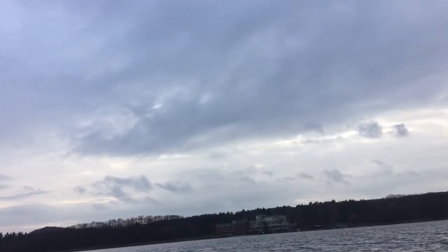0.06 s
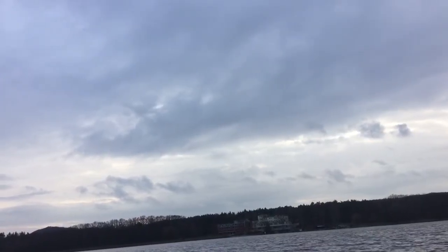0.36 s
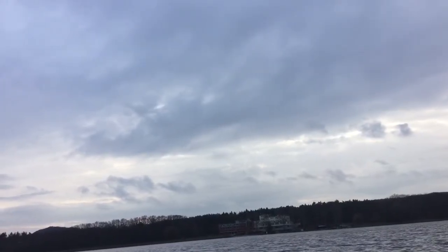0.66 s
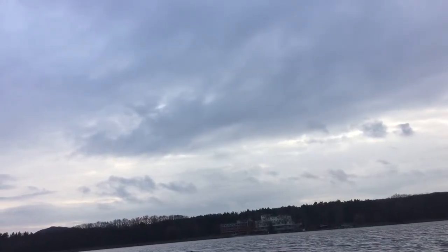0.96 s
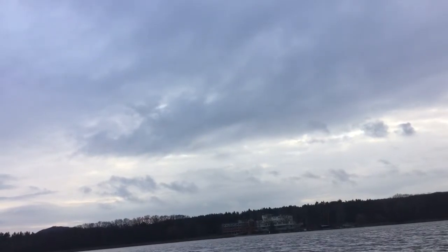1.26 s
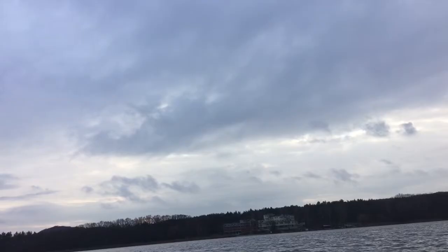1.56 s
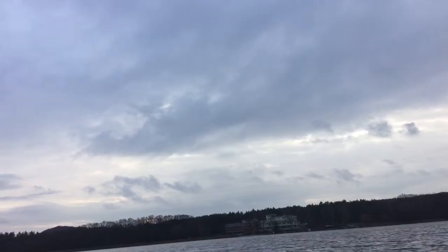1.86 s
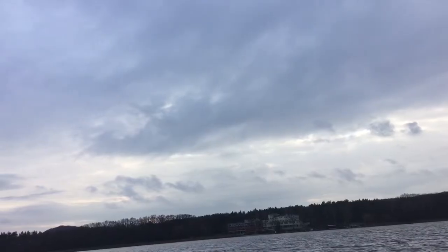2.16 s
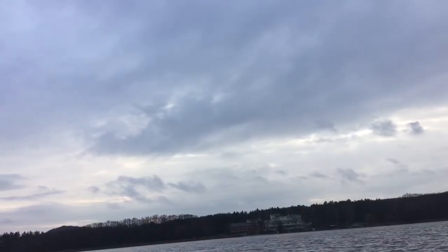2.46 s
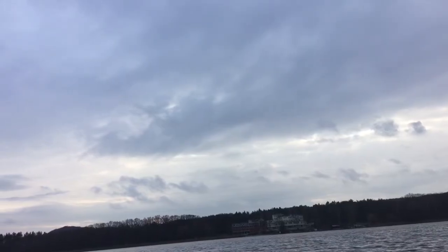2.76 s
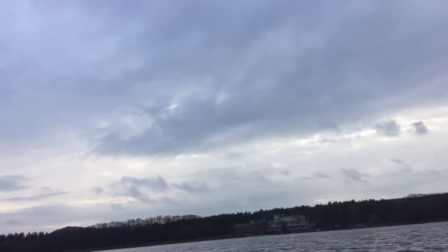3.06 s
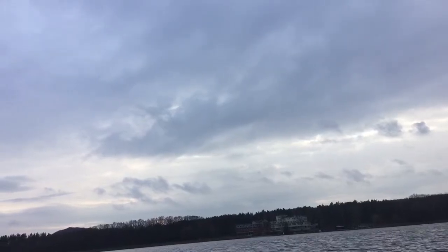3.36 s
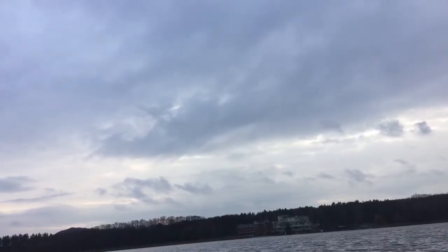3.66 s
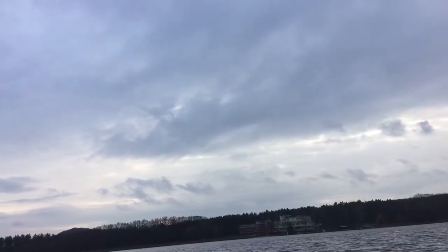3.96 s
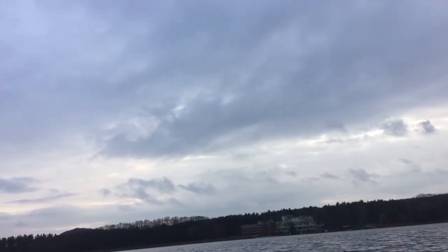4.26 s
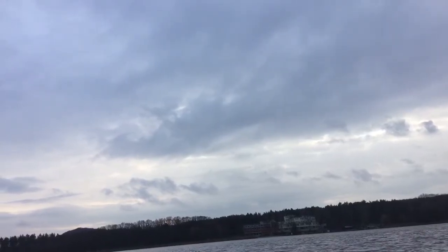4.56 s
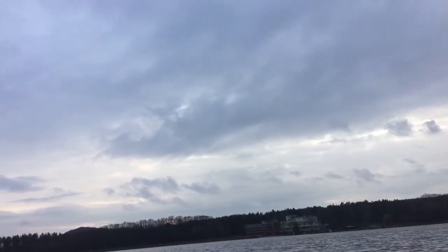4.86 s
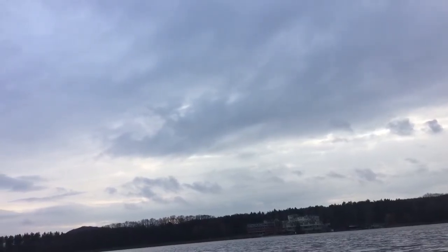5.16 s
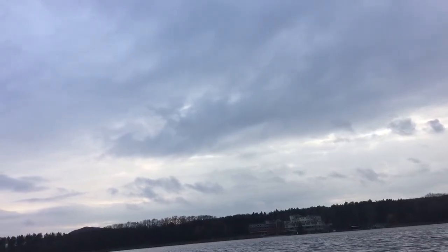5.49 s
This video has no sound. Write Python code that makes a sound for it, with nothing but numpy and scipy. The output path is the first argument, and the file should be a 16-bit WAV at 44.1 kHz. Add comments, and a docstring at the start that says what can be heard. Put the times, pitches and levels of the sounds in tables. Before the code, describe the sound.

Low wind rumbles and thumps unevenly on the microphone throughout, heard close and dry aboard a small sailing boat on a lake. A slack sail slides over itself and crinkles softly, with distinct flaps at about 1 second, from 1.2 to 1.5 seconds and near 1.9 seconds. The rigging gives faint, very short squeaks near 0.2, 0.9 and 2.9 seconds. A stronger gust thumps at about 2.5 seconds, followed by a small tick of gear. The sail flaps again around 3.2 seconds, then rustles hard from 3.5 to 3.9 seconds among sharp ticks, the loudest at 3.6 seconds. At 4.4 seconds a rope runs briefly over a fitting, which rings lightly. The sail flaps firmly just after 5 seconds, a sharp click follows at 5.3 seconds, and the cloth swishes until about 5.6 seconds.

```python
"""A small sailing boat on a breezy lake, heard from on board.
From the start, eddies thump on the microphone while the slack sail flaps, crinkles and slides over
itself; now and then the rigging squeaks and small gear ticks. Around 3.6 s the cloth rustles hard
among sharp ticks. At 4.4 s a rope runs over a ringing fitting, then the sail flaps and swishes again."""
import sys
import numpy as np
from scipy import signal
from scipy.fft import rfft, irfft, next_fast_len
from scipy.io import wavfile
from scipy.ndimage import uniform_filter1d

SR = 44100
rng = np.random.default_rng(int(sys.argv[2]) if len(sys.argv) > 2 else 0)


def digitize_waveform(pressure):
    """Quantize a signal to 16-bit integers and store it at the path in sys.argv[1].

    Rows of a 2-D input are taken as channels; values are limited to [-1, 1].
    """
    field = np.atleast_2d(pressure).T
    bounded = np.clip(field, -1, 1)
    quanta = np.round(bounded * 32767).astype(np.int16)
    wavfile.write(sys.argv[1], SR, quanta)


N = 248283
TIME = np.arange(N) / SR
CUTOFF_HZ = 15200


# The bed of wind. Each row: time in seconds, rumble and flutter levels in dB before trim.
WIND_BED = [(0, -58, -50), (0.05, -50, -63), (0.08, -30.5, -42.5), (0.2, -40.5, -52), (0.26, -37.5, -51),
            (0.35, -36, -44.5), (0.45, -36.5, -63), (0.55, -37.5, -46), (0.65, -36.5, -44),
            (0.74, -40, -59), (0.82, -37.5, -41), (0.95, -38.5, -45.5), (1.03, -44.5, -43),
            (1.17, -38, -52.5), (1.3, -39, -42.5), (1.43, -39.5, -35.5), (1.51, -44.5, -51.5),
            (1.6, -42, -47), (1.68, -32.5, -45.5), (1.75, -49.5, -55), (1.85, -36.5, -39),
            (1.95, -34.5, -41.5), (2.02, -45.5, -48), (2.11, -40, -59), (2.21, -48.5, -56.5),
            (2.3, -37.5, -48), (2.38, -41, -45.5), (2.46, -31.5, -44), (2.54, -26.5, -38.5),
            (2.6, -44, -54), (2.67, -33.5, -44.5), (2.74, -48, -63.5), (2.81, -36, -48.5),
            (2.92, -44.5, -52), (3.0, -45, -59.5), (3.11, -48.5, -52), (3.16, -43, -46.5), (3.3, -38, -53),
            (3.39, -34, -41), (3.44, -50, -48), (3.52, -47, -46.5), (3.6, -36.5, -40.5),
            (3.74, -45.5, -48.5), (3.85, -36, -53), (3.9, -45.5, -44.5), (3.98, -37.5, -49),
            (4.14, -41.5, -63), (4.22, -37, -51), (4.34, -39, -40), (4.39, -44.5, -51.5),
            (4.53, -43.5, -53.5), (4.6, -43, -46), (4.64, -40, -50.5), (4.7, -37.5, -42.5),
            (4.83, -38.5, -43.5), (4.89, -39, -51), (4.97, -35.5, -59), (5.1, -42.5, -36),
            (5.17, -38.5, -49), (5.23, -51, -47.5), (5.28, -37.5, -44), (5.44, -36, -46), (5.55, -41, -42),
            (5.63, -31, -54)]
# Eddies hitting the microphone. Each row: centre in seconds, half length in seconds, pitch in Hz,
# thump and flutter burst levels in dB before trim.
EDDY_HITS = [(0.072, 0.0077, 111, -28, -36.5), (0.306, 0.009, 96, -30, -56),
             (0.361, 0.0064, 132, -27.5, -43), (0.411, 0.0078, 79, -20, -44),
             (0.486, 0.0099, 109, -24.5, -41), (0.539, 0.0086, 133, -39, -44),
             (0.594, 0.0075, 87, -27.5, -35.5), (0.712, 0.0069, 103, -29.5, -32.5),
             (0.772, 0.0065, 90, -26.5, -42), (0.825, 0.014, 101, -32, -44),
             (0.869, 0.012, 102, -39, -36.5), (0.934, 0.011, 109, -24.5, -37),
             (0.97, 0.011, 95, -26, -35.5), (1.061, 0.011, 106, -29, -42.5),
             (1.133, 0.0068, 77, -23.5, -40.5), (1.221, 0.0075, 98.6, -25, -40.5),
             (1.297, 0.0063, 106, -28, -37), (1.414, 0.011, 115, -26, -37.5), (1.644, 0.0085, 87, -23, -32),
             (1.837, 0.0068, 110, -28.5, -46), (1.912, 0.012, 116, -34, -39.5),
             (2.069, 0.01, 132, -27.5, -44), (2.152, 0.0053, 112, -29.5, -41.5),
             (2.276, 0.0097, 72.5, -24, -39.5), (2.561, 0.005, 103, -15.5, -32.5),
             (2.615, 0.0091, 95, -28.5, -48), (3.168, 0.014, 105, -30, -52), (3.222, 0.0098, 100, -28, -42),
             (3.275, 0.0096, 111, -33.5, -37), (3.335, 0.011, 116, -40, -37.5),
             (3.576, 0.012, 125, -30.5, -37), (3.796, 0.0086, 113, -18.5, -32),
             (3.859, 0.008, 102, -33, -48), (4.091, 0.0083, 96.3, -22, -46),
             (4.196, 0.0081, 89, -26, -50.5), (4.356, 0.0048, 105, -25, -39),
             (4.584, 0.0071, 92, -26.5, -35.5), (4.755, 0.0041, 108, -19, -39.5),
             (4.83, 0.013, 94, -35.5, -35), (4.977, 0.01, 106, -26.5, -42.5),
             (5.067, 0.012, 107, -30.5, -32), (5.309, 0.0075, 89, -28.5, -36.5),
             (5.431, 0.01, 92, -29.5, -39.5)]
# Tone of the deep rumble and of the flutter above it. Each row: frequency in Hz, relative level in dB.
RUMBLE_EQ = [(12, -40), (20, -31.5), (47, -3), (81, 2), (107, -1.5), (220, -16), (290, -48.5), (480, -120)]
FLUTTER_EQ = [(110, -20), (175, 2.5), (250, -1.5), (330, -7.5), (450, -19), (650, -37.5), (1000, -64)]

def wind(rumble_trim_db=1.5, thump_trim_db=-1.5, burst_trim_db=2.5, sag_per_s=20.3, lead_s=0.0018):
    """Turbulence on the microphone; each eddy adds a thump of sagging pitch and a burst of flutter."""
    rumble_db, flutter_db = automation(WIND_BED)
    thumps, bursts = np.zeros(N), np.zeros(N)
    for at_s, half_s, hz, thump_db, burst_db in EDDY_HITS:
        near, t = around(at_s, reach_s=0.06)
        phase = 2 * np.pi * (hz * (t - sag_per_s * t * t / 2) + rng.random())
        thump_shape = np.exp(-0.5 * (t / half_s) ** 2)
        burst_shape = np.exp(-0.5 * ((t + lead_s) / (1.035 * half_s)) ** 2)  # small whirls arrive first
        thumps[near] += from_db(thump_db + thump_trim_db) * np.sqrt(2) * thump_shape * np.sin(phase)
        bursts[near] += from_db(burst_db + burst_trim_db) * burst_shape
    rumble = levelled(equalised(rng.standard_normal(N), RUMBLE_EQ), span_s=0.069)
    flutter = levelled(equalised(rng.standard_normal(N), FLUTTER_EQ), span_s=0.016)
    flutter_gain = np.hypot(from_db(flutter_db), bursts)
    return from_db(rumble_db + rumble_trim_db) * rumble + thumps + flutter_gain * flutter


# Cloth sliding over itself. Each row: time in seconds, body, crinkle and swish levels in dB before trim.
SAIL_SLIDE = [(0, -66, -70, -77), (0.1, -62, -74, -73), (0.13, -56, -68, -80), (0.21, -67, -61, -80),
              (0.27, -67, -77, -75), (0.32, -56, -71, -80), (0.42, -65, -66.5, -78),
              (0.5, -62.5, -73.5, -81), (0.57, -66.5, -76, -79), (0.68, -67, -67.5, -76),
              (0.75, -68, -68, -77), (0.82, -60, -64.5, -76), (0.9, -62, -73, -75), (1.0, -58, -61.5, -70),
              (1.08, -67, -75, -71), (1.16, -61, -70.5, -74.5), (1.22, -50, -62, -74),
              (1.26, -67, -72, -78), (1.33, -57, -59, -72), (1.36, -48.5, -61, -62),
              (1.43, -52.5, -54.5, -59), (1.49, -52.5, -64, -80), (1.6, -59.5, -76, -75),
              (1.7, -61, -66, -73.5), (1.77, -68, -68, -76), (1.84, -57, -70, -82), (1.95, -52, -70, -76),
              (2.02, -65, -75, -81), (2.2, -69, -74.5, -77.5), (2.4, -68, -72, -79),
              (2.51, -61.5, -75, -77.5), (2.57, -59, -58, -71), (2.63, -59, -62, -77),
              (2.7, -69.5, -72.5, -77), (2.79, -66, -65.5, -68.5), (2.84, -70, -61.5, -70),
              (2.95, -69, -73, -75), (3.0, -65.5, -75, -69), (3.08, -65, -68, -75), (3.16, -61, -66, -71),
              (3.24, -59, -60.5, -72), (3.33, -61, -60, -68), (3.44, -59.5, -68, -76),
              (3.47, -48.5, -50.5, -71), (3.54, -48.5, -52.5, -67.5), (3.59, -47, -47, -67),
              (3.63, -45.5, -57, -70), (3.67, -55, -45, -56), (3.71, -57, -49.5, -65),
              (3.755, -56, -61, -71), (3.82, -51.5, -48.5, -60), (3.865, -48, -50, -64),
              (3.9, -63, -73, -75), (3.98, -72.5, -74.5, -79), (4.06, -67, -73.5, -81),
              (4.12, -61.5, -65.5, -75), (4.2, -67, -73.5, -81.5), (4.28, -68, -76, -84),
              (4.35, -62, -71, -77), (4.53, -69, -70, -83), (4.62, -63, -65, -78), (4.68, -67, -67, -75),
              (4.71, -58, -56, -59.5), (4.77, -60, -60.5, -61), (4.81, -59.5, -73, -68),
              (4.88, -64.5, -71.5, -78.5), (5.02, -69, -71.5, -76), (5.11, -64, -65, -76),
              (5.2, -54.5, -64.5, -75), (5.24, -61, -67, -73), (5.28, -53, -57.5, -74),
              (5.345, -56, -55, -75), (5.365, -58, -51.5, -54), (5.44, -56.5, -54.5, -53.5),
              (5.485, -56, -53.5, -53), (5.52, -55, -59, -74), (5.58, -65, -57.5, -67.5),
              (5.63, -67, -74, -88)]
# Flaps of the sail. Each row: peak time, rise and fall in seconds, then body, crinkle and swish levels
# in dB before trim.
SAIL_FLAPS = [(0.052, 0.0053, 0.008, -73, -67.5, -64), (0.118, 0.004, 0.016, -61, -62.5, -73),
              (0.176, 0.0055, 0.012, -55.5, -58, -63.5), (0.341, 0.0089, 0.013, -55, -52.5, -72),
              (0.374, 0.0036, 0.011, -52, -49, -50), (0.402, 0.003, 0.0078, -59, -57, -68),
              (0.56, 0.02, 0.02, -68, -72, -69), (0.964, 0.008, 0.012, -36, -53.5, -52),
              (1.181, 0.0035, 0.012, -46.5, -52, -54), (1.282, 0.0093, 0.022, -41, -63.5, -67),
              (1.308, 0.0057, 0.01, -53, -60, -62), (1.346, 0.006, 0.019, -50, -49, -51.5),
              (1.401, 0.013, 0.01, -61, -55, -60), (1.429, 0.0053, 0.02, -56, -59, -56),
              (1.797, 0.0065, 0.016, -52.5, -53, -69.5), (1.872, 0.012, 0.013, -45.5, -70, -78),
              (1.887, 0.008, 0.011, -47, -54, -63.5), (1.92, 0.006, 0.016, -37, -54, -69),
              (2.256, 0.004, 0.008, -56, -71, -82), (2.534, 0.0034, 0.011, -62, -52.5, -58.5),
              (2.55, 0.01, 0.007, -47.5, -64, -74), (2.608, 0.005, 0.016, -69, -61, -69),
              (2.819, 0.0055, 0.015, -64, -59, -71), (2.872, 0.016, 0.023, -57.5, -56, -64),
              (3.176, 0.0055, 0.01, -53, -53.5, -56.5), (3.19, 0.01, 0.017, -53, -53, -52),
              (3.286, 0.0055, 0.017, -43.5, -49.5, -63), (3.581, 0.0075, 0.008, -42.5, -48, -64),
              (3.675, 0.0024, 0.0048, -50, -43.5, -50), (3.785, 0.0065, 0.013, -59, -40, -47.5),
              (3.858, 0.011, 0.014, -53, -48, -67), (3.934, 0.006, 0.011, -60, -81, -84),
              (4.318, 0.0089, 0.01, -59, -69.5, -76), (4.374, 0.0052, 0.014, -64, -57.5, -55),
              (4.571, 0.0044, 0.014, -61, -55, -60.5), (4.65, 0.0049, 0.014, -54, -51, -61.5),
              (4.752, 0.008, 0.019, -54.5, -65, -61), (5.049, 0.0065, 0.013, -39.5, -47.5, -49.5),
              (5.067, 0.0046, 0.016, -38, -48, -49.5), (5.148, 0.007, 0.018, -67, -63.5, -79),
              (5.228, 0.006, 0.01, -52, -62, -68.5), (5.324, 0.002, 0.0067, -39.5, -47, -75)]

def cloth_band(band, eq, grain, slide_trim_db, flap_trim_db):
    """One band of cloth (0 body, 1 crinkle, 2 swish): it rustles as it slides and swells at each flap."""
    flap_power = np.zeros(N)
    for peak_s, rise_s, fall_s, *levels_db in SAIL_FLAPS:
        near, t = around(peak_s, reach_s=0.15)
        shape = np.exp(-(np.minimum(t, 0) / rise_s) ** 2 - np.maximum(t, 0) / fall_s)
        flap_power[near] += (from_db(levels_db[band] + flap_trim_db) * shape) ** 2
    slide = from_db(automation(SAIL_SLIDE)[band] + slide_trim_db)
    texture = levelled(equalised(grain, eq), span_s=0.041)
    return np.sqrt(slide ** 2 + flap_power) * texture


# Tone of the sail's low, middle and high bands. Each row: frequency in Hz, relative level in dB.
BODY_EQ = [(250, -18.5), (420, 2.5), (520, 2.5), (630, 5), (690, 1), (750, 0), (900, -5.5), (1200, -6.5),
           (1600, -32.5)]
CRINKLE_EQ = [(850, -11.5), (1220, 4.5), (1420, 3), (1640, 3.5), (1900, 0.5), (2850, -1), (3200, -6),
              (5000, -14.5), (6800, -37.5)]
SWISH_EQ = [(3600, -7), (5000, -2.5), (7700, -1), (8700, 5.5), (10000, -5.5), (12300, -4.5), (15000, -20)]

def sail():
    """The belly of the sail slaps, its creases crinkle and its weave swishes."""
    belly = friction(snaps_per_s=900, spread_db=3.5, smooth_db=-6)
    creases = friction(snaps_per_s=1400, spread_db=2.5, smooth_db=-2.5)
    weave = friction(snaps_per_s=2500, spread_db=11.0, smooth_db=4.0)
    body = cloth_band(0, BODY_EQ, belly, slide_trim_db=-1.9, flap_trim_db=-0.5)
    crinkle = cloth_band(1, CRINKLE_EQ, creases, slide_trim_db=-3.75, flap_trim_db=2.0)
    swish = cloth_band(2, SWISH_EQ, weave, slide_trim_db=-4.5, flap_trim_db=1.0)
    return body + crinkle + swish


# One short run of the rope. Each row: time in seconds, level in dB before trim.
ROPE_RUN = [(0, -120), (4.36, -110), (4.385, -57), (4.405, -47), (4.42, -43.5), (4.445, -52.5),
            (4.465, -63), (4.49, -83), (4.52, -120)]
# Tone of the rubbing fibres. Each row: frequency in Hz, relative level in dB.
ROPE_EQ = [(410, -41), (700, -21), (965, -2), (1260, -12), (1650, -11.5), (2460, -4.5), (2760, -10.5),
           (3850, -11.5), (4210, -15), (8750, -9.5), (15000, -29)]
# The fitting's ring. Each row: pitch in Hz, width in Hz before narrowing, level in dB before halving.
FITTING_MODES = [(945, 29, -1.5), (1667, 27, -5), (2880, 150, -1), (3570, 33, -11), (3750, 58, 2),
                 (5000, 51, -12), (5770, 31, -7), (6250, 40, -13), (7260, 30, -13), (7880, 35, -5),
                 (8740, 41, 3), (9820, 32, -16)]

def rope(ring_db=13.5, narrowing=0.6, trim_db=-1.0):
    """Rope fibres rub over a fitting, which rings on after them."""
    fibres = friction(snaps_per_s=5100, spread_db=3.0, smooth_db=1.5)
    rub = from_db(automation(ROPE_RUN)[0]) * equalised(fibres, ROPE_EQ)
    ring = sum(from_db(db / 2) * resonance(rub, hz, narrowing * width) for hz, width, db in FITTING_MODES)
    return from_db(trim_db) * (rub + from_db(ring_db) * ring) / np.sqrt(2)


# Ticks of small gear. Each row: start in seconds, peak level in dB before trim, pitch in Hz.
GEAR_TICKS = [(0.652, -53, 2600), (1.467, -42.5, 3200), (1.577, -49, 1290), (1.733, -50, 1870),
              (2.65, -37.5, 2550), (3.263, -50, 3000), (3.494, -52, 11000), (3.503, -48, 6000),
              (3.583, -40, 2200), (3.6052, -27, 1000), (3.613, -39, 1800), (3.675, -34, 2180),
              (3.746, -46, 12000), (5.323, -31, 1580)]

def gear_ticks(contact_s=0.0012, damping=0.28, trim_db=-1.5):
    """A brief rough contact excites one heavily damped resonance."""
    out = np.zeros(N)
    for start_s, db, hz in GEAR_TICKS:
        near, t = around(start_s, reach_s=0.02)
        contact = rng.standard_normal(N)[:len(t)] * (t >= 0) * np.exp(-np.abs(t) / contact_s)
        ring = resonance(contact, hz, damping * hz)
        tick = resonance(ring, hz, 2 * hz)  # a broad band-pass softens the edges
        out[near] += from_db(db + trim_db) * tick / np.abs(tick).max()
    return out


# Squeaks of the rigging. Each row: centre in seconds, half length in seconds, pitch in Hz,
# glide in octaves per second, level in dB, overtone level in dB relative to the fundamental.
RIGGING_SQUEAKS = [(.172, 0.012, 2280, 8.5, -58, -19), (.215, .025, 2840, 0, -68.5, -20),
                   (.255, .005, 10200, -2, -66, -40), (.902, .012, 2650, 1, -67.5, -20),
                   (.941, 0.0074, 2586, -6.5, -56, -8), (.952, 0.0078, 2600, -2, -50.5, -22),
                   (.977, 0.0079, 2300, -5, -57, -21), (2.87, 0.018, 1137, -1, -52, -16),
                   (2.885, 0.013, 2483, 0.5, -52, -16), (4.18, 0.0055, 8086, -4, -71, -40),
                   (5.152, 0.01, 2760, -4, -62, -19)]

def rigging_squeaks(waver=0.005):
    """Stick and slip in the rigging: short gliding tones with up to two overtones."""
    out = np.zeros(N)
    wobble = 1 + waver * drift(per_s=220)
    for at_s, half_s, hz, glide, db, overtones_db in RIGGING_SQUEAKS:
        near, t = around(at_s, reach_s=0.08)
        pitch_hz = hz * 2 ** (glide * t) * wobble[near]
        phase = 2 * np.pi * np.cumsum(pitch_hz) / SR
        overtones = sum(np.sin(k * phase) for k in (2, 3) if k * hz < CUTOFF_HZ)
        tone = np.sin(phase) + from_db(overtones_db) * overtones
        out[near] += from_db(db) * np.sqrt(2) * np.exp(-(t / half_s) ** 2) * tone
    return out


# Tone of the background hiss. Each row: frequency in Hz, relative level in dB.
HISS_EQ = [(1760, -23), (3000, -19), (5140, -20), (6550, -4), (7700, -1.5), (8410, 3.5), (10100, 1),
           (11600, 0.5), (13000, -6), (15000, -30.5)]

def hiss(level_db=-87):
    """A faint, even, bright hiss behind everything."""
    return from_db(level_db) * equalised(rng.standard_normal(N), HISS_EQ)


def friction(snaps_per_s, spread_db, smooth_db):
    """Tiny snaps of uneven size over smooth friction noise."""
    sizes = from_db(spread_db * np.minimum(rng.exponential(1, N), 4)) * rng.choice([-1, 1], N)
    snaps = sizes * (rng.random(N) < snaps_per_s / SR)
    return unit_power(snaps) + from_db(smooth_db) * rng.standard_normal(N)


def from_db(db):
    """Decibels to gain."""
    return 10 ** (np.asarray(db) / 20)


def unit_power(x):
    """Scale to an rms of 1."""
    return x / np.sqrt(np.mean(x ** 2) + 1e-20)


def automation(rows):
    """One curve per level column, ramping from row to row."""
    times_s, *columns = np.transpose(rows)
    return [np.interp(TIME, times_s, column) for column in columns]


def equalised(x, eq, skirt_db_per_octave=36):
    """Causal (minimum-phase) EQ with steep skirts; the result has unit power."""
    hz, db = np.transpose(eq)
    size = 2 * next_fast_len(N // 2 + 4096)
    octave, points = np.log2(np.maximum(np.fft.rfftfreq(size, 1 / SR), 1)), np.log2(hz)
    octaves_outside = np.abs(octave - np.clip(octave, points[0], points[-1]))
    gain = from_db(np.interp(octave, points, db) - skirt_db_per_octave * octaves_outside)
    cepstrum = irfft(np.log(gain + 1e-5))[:size // 2]
    response = np.exp(2 * rfft(cepstrum, size))
    return unit_power(irfft(rfft(x, size) * response)[:N])


def drift(per_s):
    """A random wander with unit power."""
    knots = rng.standard_normal(4096)
    return unit_power(np.interp(TIME * per_s, np.arange(len(knots)), knots))


def levelled(x, span_s):
    """Hold the power of a noise steady over the given span."""
    size = max(int(span_s * SR), 8)
    power = uniform_filter1d(uniform_filter1d(x * x, size), size)
    return x / np.sqrt(np.abs(power) + 1e-6)


def resonance(x, hz, width_hz):
    """Two-pole resonance with gain 1 at its peak."""
    r = np.exp(-np.pi * width_hz / SR)
    feedback = [1, -2 * r * np.cos(2 * np.pi * hz / SR), r * r]
    return signal.lfilter(np.array([1, 0, -1]) * (1 - r * r) / 2, feedback, x)


def around(at_s, reach_s):
    """The samples near a moment, and their times from it."""
    near = slice(max(int((at_s - reach_s) * SR), 0), int((at_s + reach_s) * SR))
    return near, TIME[near] - at_s


def scene():
    """A dry mono mix: everything is close by in open air."""
    return (hiss() + wind() + sail() + rope() + gear_ticks() + rigging_squeaks())[None, :]


def record(dry):
    """The microphone sheds the deepest rumble and the top is cut."""
    low_cut = signal.butter(2, 28, "high", fs=SR, output="sos")
    high_cut = signal.ellip(10, 0.1, 80, CUTOFF_HZ, fs=SR, output="sos")
    return signal.sosfilt(high_cut, signal.sosfilt(low_cut, dry))


dry = scene()
out = record(dry)
digitize_waveform(out)
```